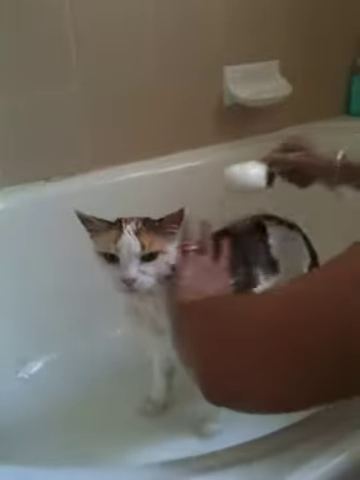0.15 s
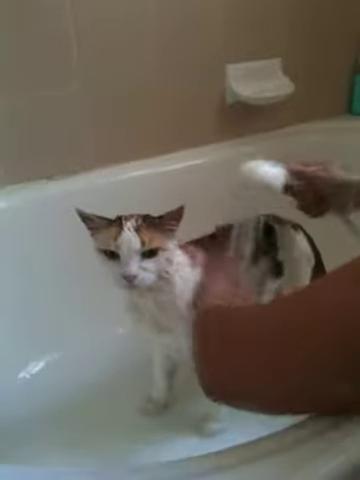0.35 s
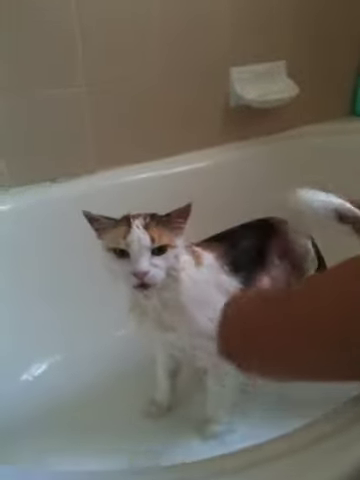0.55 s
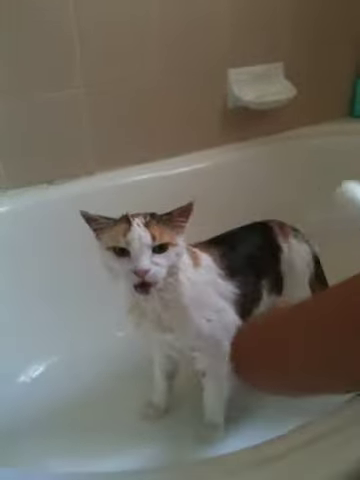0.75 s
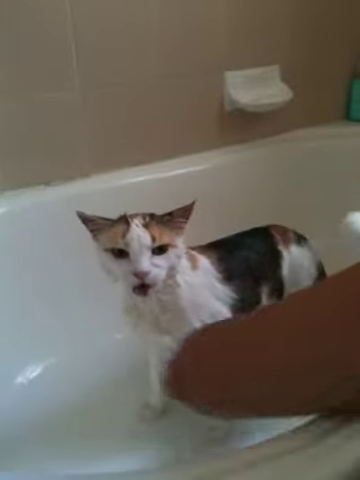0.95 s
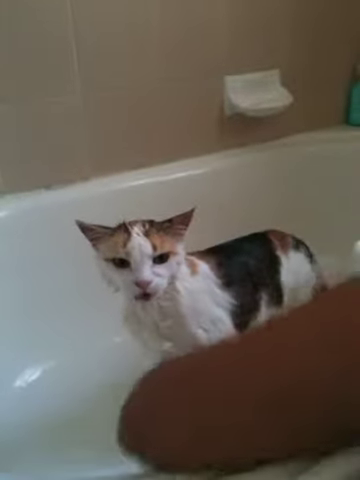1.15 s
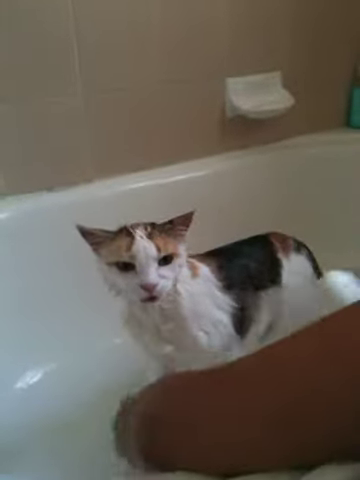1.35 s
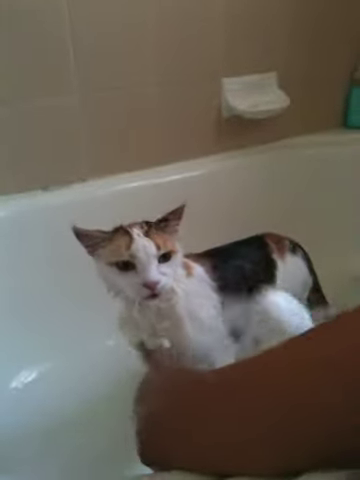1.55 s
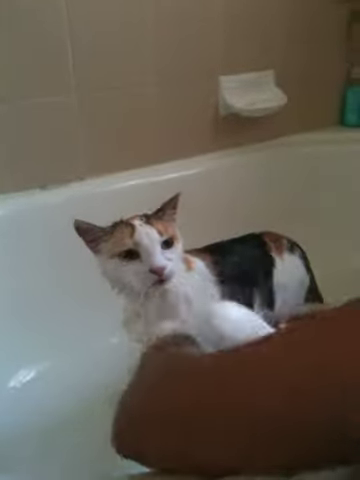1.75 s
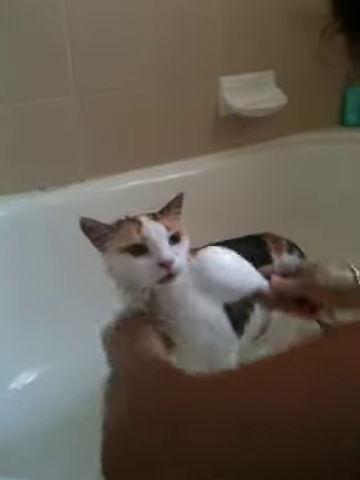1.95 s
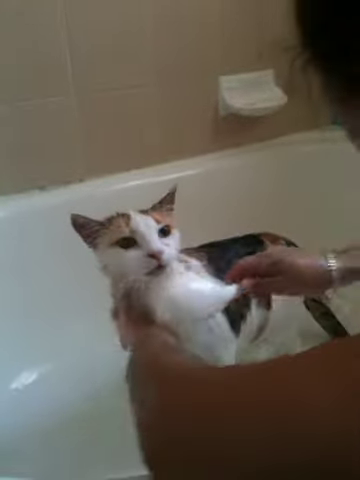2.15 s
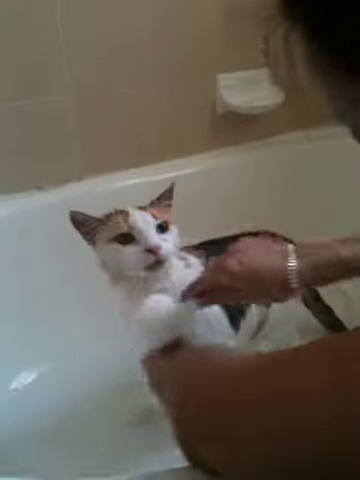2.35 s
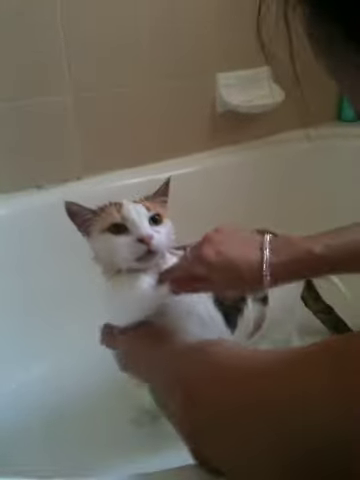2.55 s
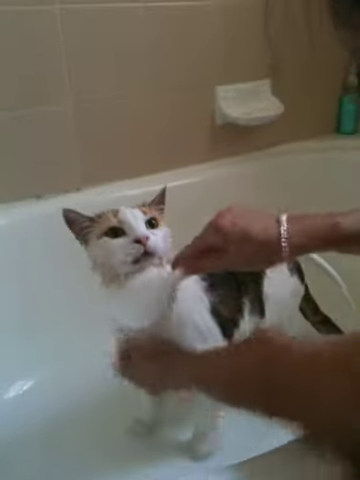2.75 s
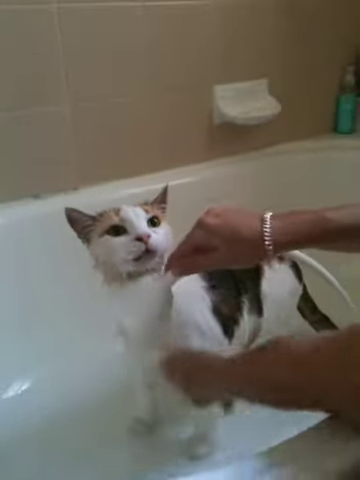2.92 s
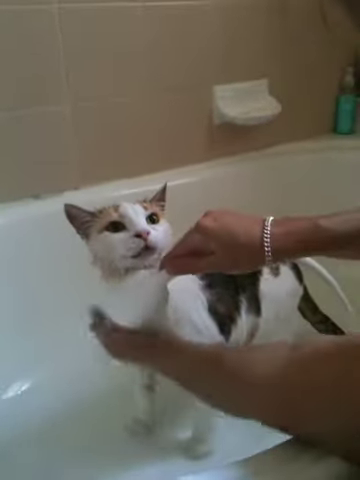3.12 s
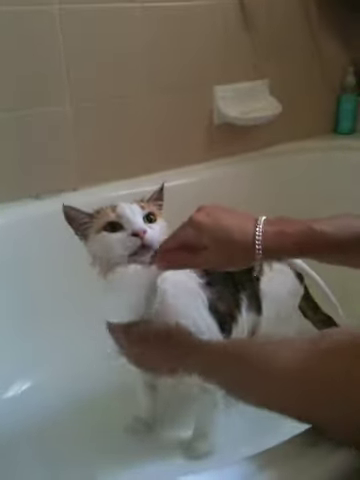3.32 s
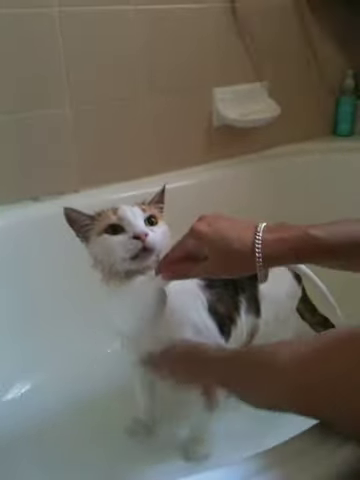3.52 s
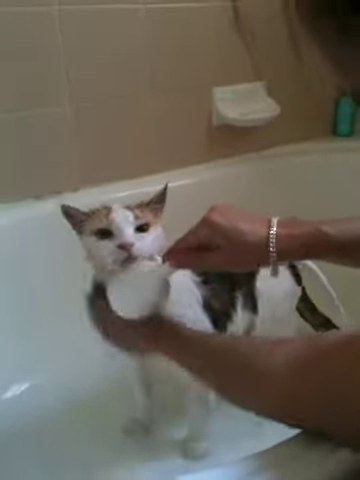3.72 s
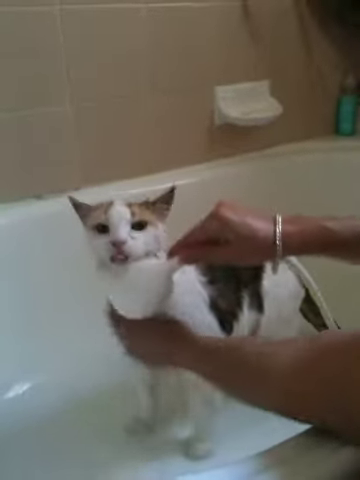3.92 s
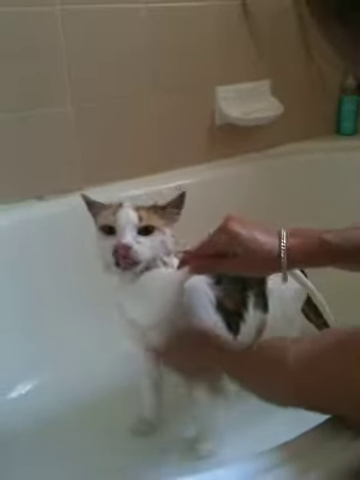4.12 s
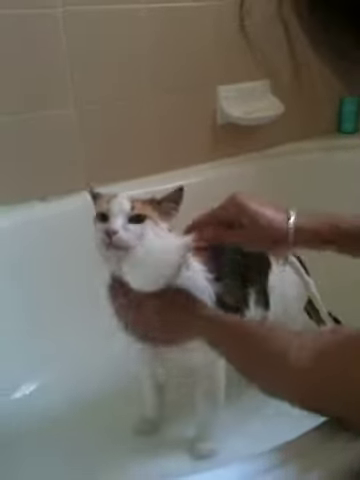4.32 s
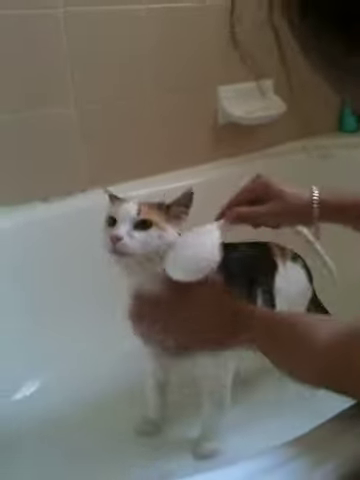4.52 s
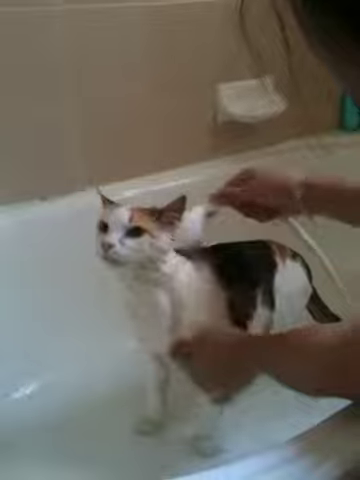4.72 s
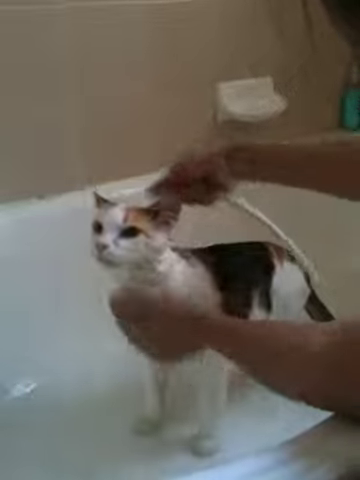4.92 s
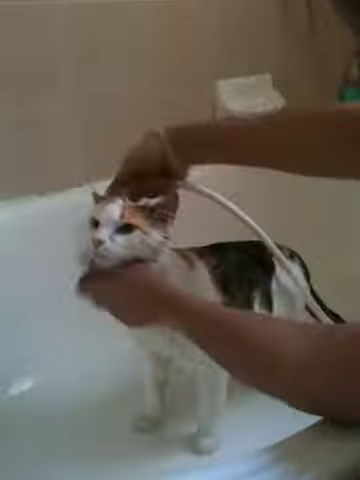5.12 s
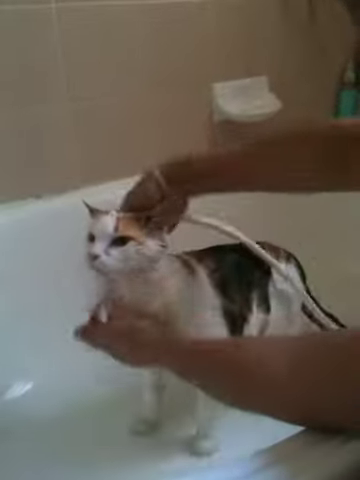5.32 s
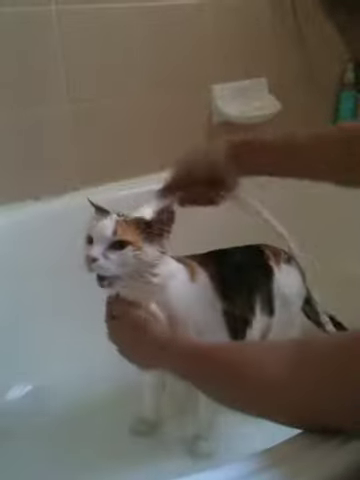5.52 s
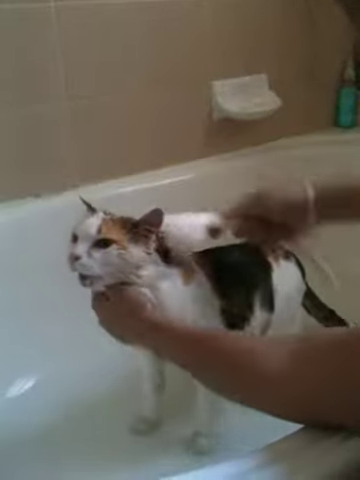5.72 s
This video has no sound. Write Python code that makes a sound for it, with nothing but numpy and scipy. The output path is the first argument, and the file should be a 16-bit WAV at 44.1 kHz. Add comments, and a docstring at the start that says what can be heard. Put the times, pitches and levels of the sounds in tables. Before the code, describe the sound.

A wet cat gives a long thin meow under a hissing hand shower, water splattering in a tub, then a louder, lower meow at the end.

```python
"""A wet cat gives one long thin meow and, later, a louder and lower one, under a hissing hand shower.
Each meow is a harmonic stack from uneven vocal folds, shaped by moving mouth resonances.
The water is filtered random drops: spray, splatter, run-off and the drummed tub shell.
Noise bursts make slaps and knocks, gliding sines make bubbles, and filtered noise a faint boom.
The small tiled room answers with a few echoes of the voice and a dense noise-like tail on everything."""
import sys
import numpy as np
from scipy import signal
from scipy.fft import rfft, irfft
from scipy.io import wavfile
from scipy.ndimage import uniform_filter1d

SR = 44100
rng = np.random.default_rng(int(sys.argv[2]) if len(sys.argv) > 2 else 0)


def log_audio(samples):
    """Write samples as a 16-bit WAV file to the path given in sys.argv[1]."""
    # one column per channel
    frames = np.atleast_2d(samples).T
    # limit to full scale, then quantise
    limited = np.clip(frames, -1, 1)
    pcm = np.round(limited * 32767).astype(np.int16)
    wavfile.write(sys.argv[1], SR, pcm)


N = 258760
TIME = np.arange(N) / SR


def long_meow():
    """A long thin call; much of it arrives off the tiles, which breaks up its harmonics."""
    # pitch and loudness of the call: t/s, f/Hz, level/dB before gain
    call = [(0.614, 464, -48), (0.655, 498.4, -47.5), (0.668, 555.7, -43), (0.702, 560, -40),
            (0.722, 580.7, -37), (0.8, 610, -37), (0.87, 613.3, -33.5), (0.93, 607, -35),
            (0.96, 615, -33.5), (1.06, 614.2, -28.5), (1.105, 612, -32), (1.13, 610.3, -37.5),
            (1.18, 603.7, -40), (1.27, 590.5, -47), (1.42, 575, -43.5), (1.51, 562.4, -48),
            (1.55, 543, -48), (1.58, 523, -57)]
    # mouth shapes: t/s, jaw f/Hz, tongue f/Hz, tongue level/dB, throat level/dB, lip f/Hz, lip level/dB
    mouth = [(0.62, 1410, 2300, -18, -12, 4930, -2), (0.68, 1660, 2260, -21, -16, 4900, -14),
             (0.73, 1760, 2350, -14, -19, 4680, -3), (0.78, 1660, 2360, -1, 2, 4570, -3.5),
             (0.85, 1750, 2420, -3, -26, 4640, -26), (0.91, 1800, 2440, -10, -13, 4760, -15),
             (0.94, 1820, 2470, -11, -8, 5130, -13.5), (1.09, 1840, 2430, -9, -18, 5480, -13),
             (1.18, 1610, 2480, -7, -10.5, 5760, -12.5), (1.42, 1470, 2300, -3.5, -24, 6160, -26),
             (1.5, 1250, 2250, -1, -25, 6100, -22), (1.55, 1511, 2200, -23, -26, 6018, -19)]
    voice = meow(call, mouth, hoarse_s=(.63, .67, 1.565),
                 jaw_width_hz=450, tongue_width_hz=140, lip_width_hz=470, buzz_db=-24.5,
                 jitter=0.0054, waver=0.00462, rasp_db=-28.5, patchy_db=2.0, gain_db=1.0)
    return room(tiles(voice), wet_db=-3.5, t60=0.36, gap_s=0.005)


def loud_meow():
    """A louder, lower call with steadier folds and a drier sound."""
    # pitch and loudness of the call: t/s, f/Hz, level/dB before gain
    call = [(5.525, 326, -57), (5.56, 359, -49.5), (5.595, 414.7, -44.5), (5.635, 437.6, -33),
            (5.653, 455.5, -34), (5.665, 479.4, -31.5), (5.708, 481.6, -24), (5.727, 470, -17),
            (5.74, 471.5, -23), (5.755, 471.3, -15), (5.765, 462, -24), (5.771, 455, -23),
            (5.779, 450, -27), (5.786, 450.6, -24), (5.799, 450.5, -17.5), (5.811, 458, -22),
            (5.819, 454.7, -23), (5.832, 455.3, -18), (5.845, 455.7, -26), (5.86, 455, -20)]
    # mouth shapes: t/s, jaw f/Hz, tongue f/Hz, tongue level/dB, throat level/dB, lip f/Hz, lip level/dB
    mouth = [(5.54, 695, 1400, -20, -18, 4500, -12), (5.59, 920, 1560, -8, -22, 4670, -9),
             (5.646, 1150, 1770, 4, -10, 4660, -14), (5.665, 1440, 2630, -14, -12.5, 4450, -24),
             (5.71, 1440, 2380, -21, -31, 4320, -32), (5.757, 1410, 2330, -23, -42, 4180, -32.5),
             (5.78, 1300, 1910, -6, -41, 4100, -28), (5.8, 1233, 1800, -6, -44, 4050, -42),
             (5.835, 1184, 1780, -8.5, -41, 4120, -43)]
    voice = meow(call, mouth, hoarse_s=(5.675,),
                 jaw_width_hz=315, tongue_width_hz=200, lip_width_hz=400, buzz_db=-40,
                 jitter=0.0029, waver=0.0023, rasp_db=-39, patchy_db=0.0, gain_db=1.0)
    return room(tiles(voice), wet_db=-9, gap_s=0.016)


def meow(call, mouth, hoarse_s, jaw_width_hz, tongue_width_hz, lip_width_hz, buzz_db,
         jitter, waver, rasp_db, patchy_db, gain_db, count=11):
    """Unsteady vocal folds give harmonics, shaped by a fixed throat and three moving mouth resonances."""
    hoarse_width_s, hoarse_ratio = 0.0266, 4.6  # bell width; extra unevenness of the folds at its peak
    rasp_rise, limp_share = 3.5, 0.28
    throat_hz, throat_width_hz = 3020, 300  # stays put while the mouth moves
    tremble_db, tremble_per_s = 1.5, 70  # random level wander
    pitch, db = curves(call)
    jaw_hz, tongue_hz, tongue_db, throat_db, lip_hz, lip_db = curves(mouth)
    since_start = TIME - call[0][0]
    until_end = call[-1][0] + 0.011 - TIME
    on = np.clip(np.minimum(since_start, until_end) / 0.0062, 0, 1)
    live = on > 0
    # around the hoarse moments the folds vibrate unevenly
    hoarse = sum(np.exp(-((TIME - s) / hoarse_width_s) ** 2) for s in hoarse_s)
    unsettled = 1 + hoarse_ratio * hoarse
    pitch = pitch * (1 + jitter * unsettled * walk(260) + waver * walk(60))
    phase = 2 * np.pi * np.cumsum(pitch) / SR
    # a weak voice leaks through the open folds, which widens the jaw resonance
    leak = 1 + np.clip(0.015 * (db.max() - db[live]), 0, 1)
    voice, power = 0, 0
    for k in range(1, count + 1):
        hz = k * pitch[live]
        gain = formant(hz, jaw_hz[live], jaw_width_hz * leak)
        gain = gain + undb(tongue_db[live]) * formant(hz, tongue_hz[live], tongue_width_hz)
        gain = gain + undb(throat_db[live]) * formant(hz, throat_hz, throat_width_hz)
        gain = gain + undb(lip_db[live]) * formant(hz, lip_hz[live], lip_width_hz)
        # a little of the bare buzz passes between the resonances
        gain = gain + undb(buzz_db) / k ** 0.54
        # the small mouth radiates lows poorly
        gain = gain * (hz / np.hypot(hz, 450)) ** 2
        # turbulence at the folds roughens the upper harmonics most, and rises when hoarse
        flutter = 1 + undb(rasp_db) * k * (1 + rasp_rise * hoarse[live]) * walk(500)[live]
        # each harmonic also swells and fades on its own
        flutter = flutter * undb(patchy_db * walk(90)[live])
        voice = voice + gain * flutter * np.sin(k * phase[live])
        power = power + gain ** 2 / 2
    out = np.zeros(N)
    out[live] = voice / np.sqrt(power)
    # when hoarse, strong and weak cycles alternate
    limp = 1 + limp_share * hoarse * np.sin(phase / 2)
    return out * limp * on * undb(db + gain_db + tremble_db * walk(tremble_per_s))


def formant(hz, centre_hz, width_hz):
    """A mouth resonance with a rounded top and steep flanks."""
    return (1 + ((hz - centre_hz) / width_hz) ** 2) ** -2


def tiles(x):
    """The nearest hard walls send the voice back; the copies beat against it as the pitch glides."""
    # first reflections from tub and wall tiles: delay t/s, level/dB relative to the direct voice
    echoes = [(0.0103, -38), (0.0177, -11.5)]
    out = x.copy()
    for delay_s, db in echoes:
        out = out + undb(db) * np.interp(TIME - delay_s, TIME, x, left=0)
    return out / np.sqrt(1 + sum(undb(2 * db) for _, db in echoes))


def shower(spray_db, splatter_db, runoff_db):
    """Fine spray hisses, bigger drops splatter, run-off patters in the tub and drums its shell."""
    # colour of each kind of water: f/Hz, relative level/dB
    spray_colour = [(3000, -36), (6000, -10), (8000, -2), (10300, -0.5), (11500, -5.5), (12500, -11),
                    (15500, -16)]
    splatter_colour = [(1500, -30.5), (3000, -7), (4000, -2.5), (5200, 0.5), (6300, 2), (7300, -3.5),
                       (10000, -25.5)]
    runoff_colour = [(300, -22), (600, -11.5), (830, -5.5), (1080, -9.5), (1450, -1.5), (1800, 0),
                     (2400, -2.5), (2850, -0.5), (2990, 4.5), (3170, -1), (3500, -5.5), (5000, -32)]
    shell_colour = [(40, -67), (70, -20), (110, -20), (150, -4.5), (200, 3), (260, -4), (360, 0.5),
                    (520, -7.5), (1000, -20)]
    # the levels of all but the shell also wander at random
    spray = colour(drops(2600, 3.0, -2.2), spray_colour) * undb(spray_db + 1.74 * walk(70))
    splatter = colour(drops(1500, 0.96, -0.44), splatter_colour) * undb(splatter_db + 1.56 * walk(65))
    runoff = colour(drops(700, 1.2, -0.063), runoff_colour) * undb(runoff_db + 1.5 * walk(30))
    shell = colour(drops(300, 1.0, 0.86), shell_colour) * undb(runoff_db - 10.5)
    return spray + splatter + runoff + shell


def flow():
    """Levels in dB of spray, splatter and run-off: each splash lifts all three above a steady flow."""
    # splashes as the jet sweeps over the cat: t/s, length t/s, spray level/dB, splatter level/dB
    splashes = [(0.0, 0.31, -56, -53.5), (0.503, 0.0095, -51.5, -75), (0.548, 0.098, -50, -46),
                (0.701, 0.17, -50, -43), (0.906, 0.31, -56, -50.5), (1.303, 0.29, -43.5, -49.5),
                (1.588, 0.13, -55, -51.5), (1.785, 0.041, -50.5, -50), (1.98, 0.08, -53, -53),
                (2.107, 0.23, -53.5, -54), (2.345, 0.25, -49.5, -47.5), (2.82, 0.15, -52.5, -53),
                (2.988, 0.16, -51, -52), (3.263, 0.039, -48.5, -61), (3.369, 0.033, -50.5, -49.5),
                (3.507, 0.11, -47, -42.5), (3.86, 0.23, -50, -48.5), (4.055, 0.2, -49, -46),
                (4.349, 0.16, -53.5, -53.5), (4.527, 0.056, -62, -49.5), (4.703, 0.1, -48, -45.5),
                (5.184, 0.13, -57, -52), (5.347, 0.013, -53, -47), (5.415, 0.026, -49, -47),
                (5.46, 0.38, -56.5, -49)]
    s, length, spray_db, splatter_db = np.transpose(splashes)
    runoff_db = splatter_db - 7  # a part of each splash runs off into the tub
    return (surges(zip(s, length, spray_db), steady_db=-58),
            surges(zip(s, length, splatter_db), steady_db=-54.5),
            surges(zip(s, length, runoff_db), steady_db=-53.5))


def surges(rows, steady_db):
    """Level in dB of a steady flow plus surges (s, length s, dB) that build up, hold and drain away."""
    rise_share, drain_s = 0.66, 0.087  # build-up as a share of the length; decay time of the drain
    power = undb(steady_db) ** 2
    for s, length, db in rows:
        rise = np.clip((TIME - s) / (rise_share * length), 0, 1)
        drain = np.exp(-np.maximum(TIME - s - length, 0) / drain_s)
        power = power + (undb(db) * rise * drain) ** 2
    return 10 * np.log10(power)


def drops(rate, spread_db, wash_db):
    """Random drop impacts (rate per second) of very unequal size over the wash of countless tiny ones."""
    size = undb(spread_db * np.minimum(rng.exponential(size=N), 4.5))
    hits = (rng.random(N) < rate / SR) * size * rng.choice([-1, 1], N)
    return unit(hits) + undb(wash_db) * rng.standard_normal(N)


def slaps(decay_s=.003, relative_width=.5, gain_db=-5):
    """Lumps of water smack on the tub: a bright crack of a few milliseconds."""
    # sharp slaps of water: t/s, level/dB before gain and decay, centre f/Hz
    smacks = [(0.5127, -31.5, 7600), (2.6569, -27.5, 6430), (2.669, -32, 4200), (3.2792, -38, 9300),
              (3.5666, -29, 6250), (4.0335, -33, 6440), (4.215, -30, 7500), (4.4047, -35, 6960),
              (4.5553, -26, 4900), (4.5734, -32, 5330), (4.5979, -31, 6560), (4.7267, -28, 5920),
              (5.3552, -32, 4440), (5.4358, -33, 6450)]
    out = np.zeros(N)
    for s, db, hz in smacks:
        add(out, s, burst(hz, relative_width * hz, decay_s) * undb(db + gain_db))
    return out


def gurgles(rate=400, scatter=0.13, cycles=12, gain_db=-2.0):
    """Run-off plunges into the puddle and traps a cluster of like-sized bubbles."""
    # gurgles and drips in the puddle: t/s, length t/s, pitch f/Hz, level/dB before gain
    plunges = [(0.161, 0.047, 1920, -53.5), (0.803, 0.086, 1020, -52), (2.463, 0.048, 3170, -49.5),
               (2.47, .19, 782, -62.5), (2.461, 0.24, 1483, -56.5), (2.656, .11, 850, -56),
               (2.845, 0.06, 1664, -53), (3.071, 0.026, 1720, -50), (3.157, 0.052, 876, -59.5),
               (3.113, 0.19, 1520, -57.5), (3.178, 0.081, 1836, -55.5), (3.302, 0.074, 1343, -50.5),
               (3.382, .09, 1390, -60), (3.384, 0.02, 5640, -46.5), (3.415, 0.046, 1077, -57.5),
               (3.907, 0.039, 3230, -49), (3.996, 0.065, 740, -56.5), (4.21, 0.038, 2040, -48),
               (4.298, 0.033, 784, -51.5), (4.664, 0.031, 1013, -52), (4.663, 0.043, 2016, -48),
               (4.871, 0.055, 1620, -53), (5.199, 0.049, 808, -53.5), (5.207, 0.017, 4430, -52.5)]
    out = np.zeros(N)
    for s, length, hz, db in plunges:
        cluster = np.zeros(SR // 2)
        for when, size, pitch in rng.random((int(rate * length) + 2, 3)):
            bubble_hz = hz * (1 + scatter * (2 * pitch - 1))
            add(cluster, when * length, size * bubble(bubble_hz, cycles))
        level = np.sqrt(length * SR / np.sum(cluster ** 2))
        add(out, s, cluster * undb(db + gain_db) * level)
    return out


def tinkle(splatter_db, count=300, low_hz=2600, high_hz=11000, cycles=14, spread_db=3, gain_db=1):
    """Single small bubbles, mostly high, louder when more water splatters."""
    out = np.zeros(N)
    for when, pitch, size in rng.random((count, 3)):
        hz = low_hz * (high_hz / low_hz) ** np.sqrt(pitch)
        strength = undb(-spread_db * np.log(size + 0.047))
        add(out, when * N / SR, strength * bubble(hz, cycles))
    return out * undb(splatter_db + gain_db)


def bubble(hz, cycles, glide=0.126):
    """A trapped air bubble rings and rises in pitch as it nears the surface."""
    age = TIME[:int(5 * cycles / hz * SR)] * hz / cycles  # in decay times, each lasting `cycles` periods
    return np.exp(-age) * np.sin(2 * np.pi * cycles * age * (1 + glide * age / 5))


def knocks(relative_width=0.55, rise_s=0.018):
    """Soft blows set the damped shell of the tub ringing."""
    # dull knocks of a rubbing hand and falling water: t/s, decay t/s, centre f/Hz, level/dB before rise and
    # decay
    blows = [(1.385, 0.046, 350, -44.5), (1.39, 0.034, 228, -47.5), (1.998, 0.048, 208, -48),
             (2.97, 0.043, 212, -52), (3.57, 0.043, 217, -46), (3.577, 0.011, 480, -39),
             (4.14, 0.061, 357, -51), (4.15, 0.11, 210, -54.5), (4.729, 0.035, 337, -45.5),
             (4.74, 0.035, 166, -47)]
    out = np.zeros(N)
    for s, decay_s, hz, db in blows:
        ring = burst(hz, relative_width * hz, decay_s)
        rise = 1 - np.exp(-TIME[:len(ring)] / rise_s)
        add(out, s, ring * rise * undb(db))
    return out


def booms():
    """The tub booms faintly: low noise around a resonance near 77 Hz swells and drains."""
    # faint booms: t/s, length t/s, level/dB
    swells = [(.76, 0.14, -68), (0.95, 0.35, -78), (4.69, 0.12, -74)]
    boom_colour = [(45, -59), (66, -33), (77, 4), (90, -2.0), (130, -6), (300, -63)]  # f/Hz, level/dB
    noise = colour(rng.standard_normal(N), boom_colour)
    return noise * undb(surges(swells, steady_db=-102))


def room(x, wet_db, t60=0.48, gap_s=.003):
    """Direct sound plus the dense, quickly fading reflections of tub and tiles, after a short gap."""
    t = TIME[:SR // 2]
    tail = rng.standard_normal(len(t)) * np.exp(-np.log(1000) * t / t60) * (t > gap_s)
    wet = signal.fftconvolve(x, tail / np.sqrt(np.sum(tail ** 2)))[:N]
    return (x + undb(wet_db) * wet) / np.sqrt(1 + undb(2 * wet_db))


def burst(hz, width_hz, decay_s):
    """A band of noise that starts at once and dies away."""
    t = TIME[:SR // 2]
    band = resonance(np.fft.rfftfreq(len(t), 1 / SR) + 1, hz, width_hz) ** 2
    fade = np.exp(-t / decay_s)
    sound = irfft(rfft(rng.standard_normal(len(t))) * band, len(t)) * fade
    return sound * np.sqrt(np.sum(fade ** 2) / np.sum(sound ** 2))


def resonance(hz, centre_hz, width_hz):
    """Gain of a band-pass resonance, 1 at its centre."""
    return 1 / np.sqrt(1 + ((hz ** 2 - centre_hz ** 2) / (hz * width_hz)) ** 2)


def colour(x, points):
    """Causal filter with the given (Hz, dB) shape, so that clicks keep their sharp front; rms 1."""
    hz, db = np.transpose(points)
    gain = undb(np.interp(np.log(np.fft.rfftfreq(N, 1 / SR) + 1), np.log(hz), db))
    # folding the cepstrum onto positive time gives minimum phase
    cepstrum = irfft(np.log(gain), N) * (1 + np.sign(N / 2 - np.arange(N)))
    cepstrum[0] /= 2
    return unit(irfft(rfft(x) * np.exp(rfft(cepstrum)), N))


def walk(rate):
    """Smooth random wander of rms 1, heading for a new value `rate` times a second."""
    k = max(int(SR / rate), 1)
    steps = np.repeat(rng.standard_normal(N // k + 1), k)
    return unit(uniform_filter1d(steps, k)[:N])


def curves(rows):
    """The columns of a timed table, one value per sample."""
    s, *columns = np.transpose(rows)
    return [np.interp(TIME, s, c) for c in columns]


def add(out, s, sound):
    """Mix a short sound in at time s."""
    i = max(int(s * SR), 0)
    out[i:i + len(sound)] += sound[:max(N - i, 0)]


def undb(db):
    """Decibels to gain."""
    return 10 ** (np.asarray(db) / 20)


def unit(x):
    """Scale to rms 1."""
    return x / np.sqrt(np.mean(x ** 2) + 1e-20)


def scene():
    """Cat and water share the tiled room."""
    cat = long_meow() + loud_meow()
    spray_db, splatter_db, runoff_db = flow()
    water = shower(spray_db, splatter_db, runoff_db) + slaps()
    water = water + gurgles() + tinkle(splatter_db) + knocks() + booms()
    return (cat + room(water, wet_db=-7.5, gap_s=0.0057))[None]


def record(dry):
    """The deep bass is thinned below 58 Hz and the top cut steeply above 15.7 kHz."""
    thin = signal.sosfilt(signal.butter(4, 58, "high", fs=SR, output="sos"), dry)
    return signal.sosfilt(signal.ellip(10, .2, 80, 15700, fs=SR, output="sos"), thin)


dry = scene()
out = record(dry)
log_audio(out)
```